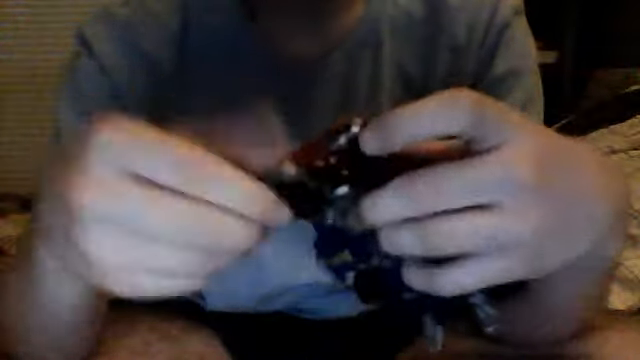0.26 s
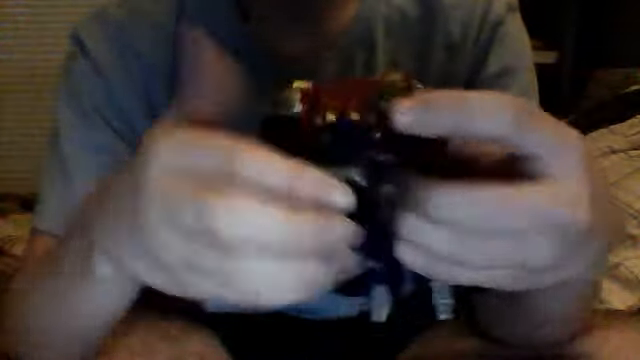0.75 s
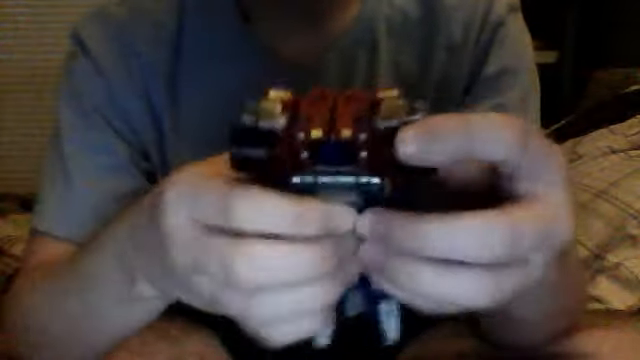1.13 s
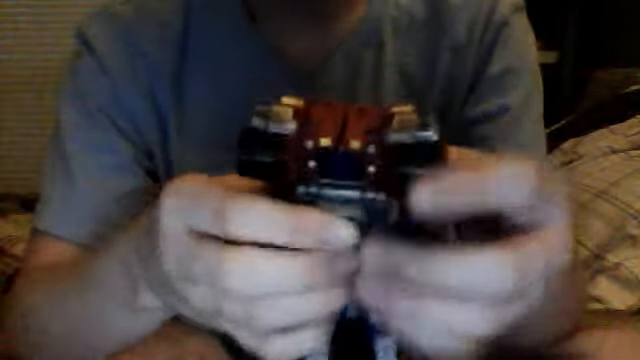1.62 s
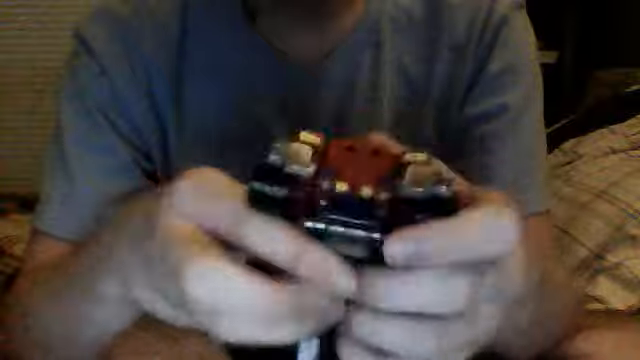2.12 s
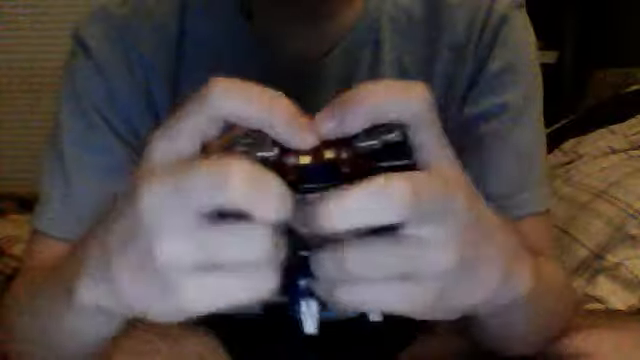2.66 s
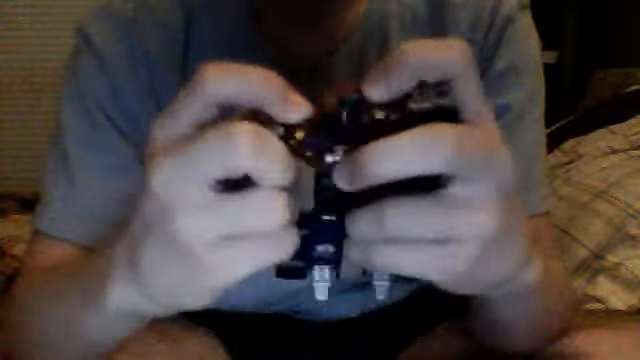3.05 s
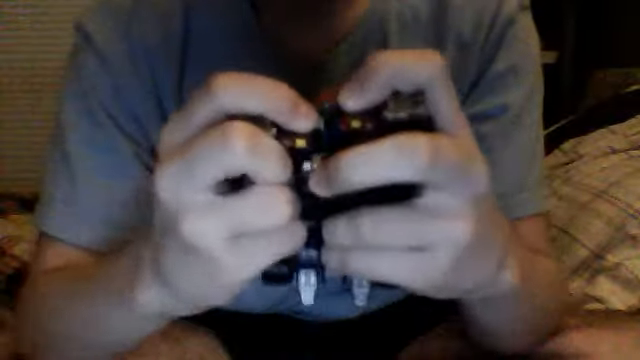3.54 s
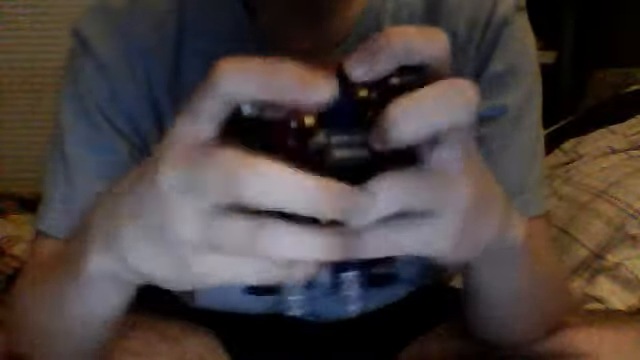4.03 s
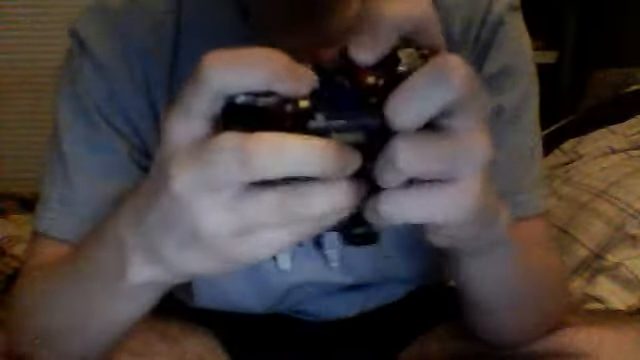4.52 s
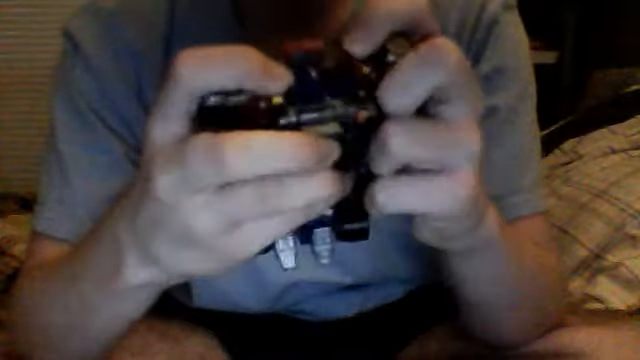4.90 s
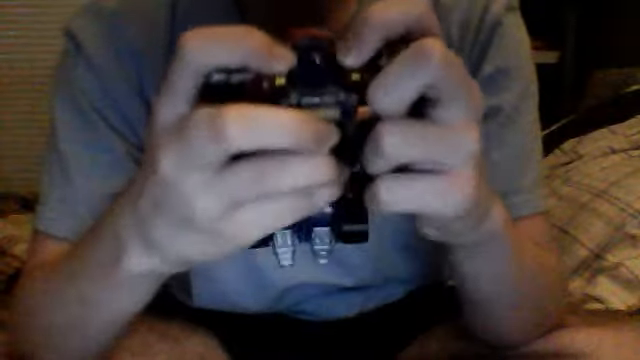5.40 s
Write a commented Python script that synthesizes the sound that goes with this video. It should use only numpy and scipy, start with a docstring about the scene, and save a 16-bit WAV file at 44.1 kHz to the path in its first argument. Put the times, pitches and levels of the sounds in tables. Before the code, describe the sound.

Hard plastic parts click and snap into place in bursts, loose pieces rattling briefly, in a small quiet bedroom with a faint fan.

```python
"""A plastic transforming toy is folded by hand close to a small microphone, with a fan humming faintly throughout.
Near 1 s the first snap rattles and pings; faint clicks and a stiff joint turning follow until 2.7 s.
A cluster of light knocks comes around 3 s, a hard snap at 3.4 s, then more turning, clicks and snaps up to
the hardest snap at 5.1 s and its rattle; one faint click ends it. Each contact is a crack of noise plus decaying
tones; a small bedroom answers with fading noise, and a noise suppressor cuts that tail short."""
import sys
import numpy as np
from scipy import signal
from scipy.fft import rfft, irfft
from scipy.io import wavfile
from scipy.ndimage import uniform_filter1d, map_coordinates

SR = 44100
rng = np.random.default_rng(int(sys.argv[2]) if len(sys.argv) > 2 else 0)


def bounce(signal):
    """Save signal as a 16-bit WAV file at the path given by the first command-line argument."""
    frames = np.transpose(np.atleast_2d(signal))
    limited = np.clip(frames, -1, 1)
    pcm = np.round(limited * 32767).astype(np.int16)
    wavfile.write(sys.argv[1], SR, pcm)


N = 250047  # length in samples


def amp(db):
    """Turn decibels into a gain."""
    return 10 ** (np.asarray(db) / 20)


def unit(x):
    """Scale x to an rms of 1."""
    return x / np.sqrt(np.mean(x ** 2) + 1e-20)


def along(points, hz):
    """Read a curve of (pitch_hz, value) points, with straight lines on a log pitch axis."""
    point_hz, value = np.transpose(points)
    return np.interp(np.log(hz + 1), np.log(point_hz + 1), value)


def wobble(rate):
    """A smooth random curve through `rate` random points a second."""
    points = rng.standard_normal(int(N * rate / SR) + 4)
    return map_coordinates(points, [np.arange(N) * rate / SR])


def noise(spectrum, size):
    """Noise coloured by a table of levels over pitch, at an rms of 1."""
    hz = np.fft.rfftfreq(size, 1 / SR)
    white = rfft(rng.standard_normal(size))
    return unit(irfft(white * amp(along(spectrum, hz)), size))


def add(out, start_s, sound):
    """Mix a sound into out at start_s seconds."""
    out[round(start_s * SR):][:len(sound)] += sound


# colour of the fan's air and the microphone's hiss: pitch_hz, relative level_db per Hz
AIR_COLOUR = [(15, 6), (50, 7.5), (140, 5), (250, 1), (400, -5), (600, -1), (1150, -6), (1600, -11.5),
              (2150, -7), (2750, -18.5), (3400, -21), (4500, -30), (7000, -31.5), (8800, -46.5),
              (16000, -50.5)]
# mains hum and fan tones, before they waver: pitch_hz, level_db (rms)
FAN_TONES = [(48.4, -67), (339.1, -75.5), (633, -68.5), (1265.5, -73), (2620, -88.5), (2998, -87)]


def fan(air_db=-56.0, drift=0.0024, flutter_db=2):
    """Steady rushing noise under tones that waver together in pitch and separately in level."""
    turns = np.cumsum(1 + drift * wobble(4.1)) / SR  # cycles of a tone of 1 Hz
    out = amp(air_db) * noise(AIR_COLOUR, size=N)
    for hz, db in FAN_TONES:
        tone = unit(np.sin(2 * np.pi * hz * turns))
        out += amp(db + flutter_db * wobble(7.1)) * tone
    return out


# how long the bedroom rings: pitch_hz, decay_s (time to fall 60 dB)
ROOM_DECAY = [(150, 0.067), (1000, 0.2), (3000, 0.23), (6500, 0.19), (10000, 0.04)]
# what bedding and walls send back: pitch_hz, relative level_db
WALL_COLOUR = [(150, -3.5), (900, -2.5), (1600, -7), (3000, -4), (4400, 0), (6200, -2.5), (10000, 4.5)]


def room(x, build_up_s=0.002):
    """Walls scatter sound into a fading noise tail, drawn anew for each twelfth of the scene."""
    out = np.zeros(N + SR)
    for piece in np.array_split(np.arange(N), 12):
        hz, t, grains = signal.stft(rng.standard_normal(SR // 3), SR, nperseg=256)
        decay_db = 60 * t / along(ROOM_DECAY, hz)[:, None]
        colour_db = along(WALL_COLOUR, hz)[:, None]
        tail = signal.istft(grains * amp(colour_db - decay_db), SR, nperseg=256)[1]
        tail *= 1 - np.exp(-(np.arange(len(tail)) / SR / build_up_s) ** 2)
        wet = signal.fftconvolve(x[piece], tail / np.linalg.norm(tail))
        add(out, piece[0] / SR, wet)
    return out[:N]


def suppressor(x, threshold_db=-38, steepness=0.52, memory_s=0.0095):
    """Noise suppression passes strong reverberation and turns it down once its short-term power is low."""
    power = np.abs(uniform_filter1d(x ** 2, size=int(memory_s * SR)))
    return x * np.minimum(1, power / amp(threshold_db) ** 2) ** steepness


# stiff joints being turned: peak time start_s, level_db added to the grip
JOINT_TURNS = [(1.959, -70), (3.8, -79), (4.02, -77), (4.17, -76), (4.212, -64)]


def effort(grip_db=-84, rise_s=0.015, fall_s=0.025):
    """Gain of the rubbing: a light steady grip plus an exponential swell and fade for each turn."""
    t = np.arange(N) / SR
    gain = amp(grip_db)
    for s, db in JOINT_TURNS:
        distance = np.maximum((s - t) / rise_s, (t - s) / fall_s)
        gain = gain + amp(db) * np.exp(-distance)
    return gain


def rubbing(slips_per_s=130, spread_db=4, low_hz=2600):
    """Stiff joints turn in tiny random slips that ring only the small parts, so the bass is filtered off."""
    slips = (rng.random(N) < slips_per_s / SR) * amp(spread_db * rng.standard_normal(N))
    highpass = signal.butter(2, low_hz, "high", fs=SR, output="sos")
    ring = signal.sosfilt(highpass, contact(low_hz, crack_db=5.5))
    return effort() * unit(signal.fftconvolve(slips, ring)[:N])


# colour of the whole toy jolting in the hands: pitch_hz, relative level_db per Hz
THUD_COLOUR = [(25, -6.5), (90, 1.5), (200, -6), (450, -1.5), (700, -3), (1500, -40), (16000, -100)]


def thuds(base_db=-4.5, growth=2.1, decay_s=.06, attack_s=0.0013):
    """Each knock jolts the toy with dull fading noise, which gains `growth` dB for each dB of the knock."""
    out, t = np.zeros(N + SR), np.arange(SR // 8) / SR
    envelope = amp(-60 * t / decay_s) * (1 - np.exp(-t / attack_s))
    for s, db, *_ in KNOCKS:
        jolt = noise(THUD_COLOUR, size=len(t)) * envelope
        add(out, s, amp(base_db + growth * db) * jolt)
    return out[:N]


# springy tabs slipping free: start_s, level_db (before the fade), pitch_hz
TAB_PINGS = [(1.0188, -16, 6700), (2.9108, -28, 6020), (3.1622, -20, 3200), (3.4328, -16.5, 6560),
             (4.2215, -27, 6050), (4.2338, -39, 6000), (4.2745, -28, 4230), (4.5895, -11, 6070),
             (5.1168, -25, 6150)]


def pings(decay_s=.02, attack_s=.001):
    """A tab that no finger touches rings on as one short, clear, fading tone."""
    out, t = np.zeros(N + SR), np.arange(SR // 16) / SR
    fade = amp(-60 * t / decay_s) * (1 - np.exp(-(t / attack_s) ** 2))
    for s, db, hz in TAB_PINGS:
        add(out, s, amp(db) * fade * np.sin(2 * np.pi * hz * t))
    return out[:N]


# tones of panels and tabs, before random shifts: pitch_hz, relative level_db, decay_s (to fall 60 dB)
PLASTIC_TONES = [(3232, 5.5, 0.016), (4265, -4, .016), (5990, 0, 0.012), (6677, -10, 0.017)]
# the dry crack of two edges meeting: pitch_hz, relative level_db per Hz
CRACK_COLOUR = [(30, -25), (150, -20), (400, -17.5), (950, -9), (1350, 1), (2800, 7.5), (5000, 0),
                (6900, -2), (7500, -13), (9000, -32), (11000, -40.5), (16000, -56.5)]


def contact(body_hz, crack_db, body_db=2, body_t60=0.015, attack_s=0.0015, scatter_db=1.0):
    """Plastic touches plastic: a crack of noise and the short ring of the hollow body and other parts."""
    t = np.arange(2048) / SR
    parts = [(body_hz, body_db, body_t60)] + PLASTIC_TONES
    hz, db, t60 = np.transpose(parts)[:, :, None]
    shift, strength, phase = rng.standard_normal((3, len(hz), 1))
    hz = hz * (1 + .015 * shift)  # the grip detunes the parts
    fade = amp(db + scatter_db * strength - 60 * t / t60)
    ring = (fade * np.sin(2 * np.pi * (hz * t + phase))).sum(0)
    crack_t60 = .021  # seconds; the fingers damp it at once
    crack = noise(CRACK_COLOUR, size=len(t)) * amp(-60 * t / crack_t60)
    onset = 1 - np.exp(-(t / attack_s) ** 2)
    return (unit(ring) + amp(crack_db) * unit(crack)) * onset


# borders between thump, hollow body, large panel, small panel and tabs: pitch_hz
REGISTER_BORDERS = [150, 900, 2500, 3800, 5200, 8000]


def voiced(click, register_db):
    """Big parts sound low and small tabs high: set the click's level in each register."""
    size = 2 * len(click)
    hz = np.fft.rfftfreq(size, 1 / SR)
    spectrum = rfft(click, size)
    edges = np.searchsorted(hz, REGISTER_BORDERS)
    energy = np.add.reduceat(np.abs(spectrum) ** 2, edges)[:-1] / len(click)
    gain_db = register_db - 10 * np.log10(energy / (.005 * SR))  # levels hold for a 5 ms click
    register = np.searchsorted(edges[1:-1], np.arange(len(hz)))
    gain_db = uniform_filter1d(gain_db[register], size=60)  # soften the borders
    cepstrum = irfft(np.log(amp(gain_db)))[:len(click)]
    cepstrum[1:] *= 2  # causal colour: nothing sounds before the touch
    return irfft(spectrum * np.exp(rfft(cepstrum, size)))[:len(click)]


# an even contact, one row a register from thump to tabs:
# pitch in octaves from the large panel, level_db, share (0 to 1) of the panels' lift
EVEN_CONTACT = [(-1.5, -18.5, 0.094), (-0.85, 1.5, 0), (-0.32, -1, 0.99), (0.32, -2, 0.8), (0.98, 1, 0)]


def strike(strength_db, brightness, panels_db, body_hz, crack_db):
    """A harder edge tilts the contact towards the treble; a blow on a panel lifts the middle."""
    octaves, even_db, panel_share = np.transpose(EVEN_CONTACT)
    register_db = strength_db + even_db + brightness * octaves + panels_db * panel_share
    return voiced(contact(body_hz, crack_db), register_db)


def rattle(first_db, count=3, unevenness=0.066, gap_s=.0048, slowing=1.3, loss_db=8.5):
    """Loose parts bounce after a knock, ever weaker, at widening gaps: (delay s, dB), the knock first."""
    k = np.arange(count)
    gaps_s = gap_s * slowing ** k * np.exp(unevenness * rng.standard_normal(count))
    return [(0, 0), *zip(np.cumsum(gaps_s), first_db - loss_db * k)]


# snaps and the strongest rattling knocks after them: start_s, strength_db, brightness (dB per octave),
# lift of the panels in dB, pitch_hz of the hollow body (before detuning), first bounce in dB against the knock
KNOCKS = [(1.0179, -19.5, -1, 1.5, 2044, -18.5), (2.8972, -35, -4, 1.5, 1430, -5.5),
          (2.9079, -40.5, 0.5, 9.5, 1310, -7.5), (2.9559, -50, -3.5, 12.5, 2220, 1),
          (2.9642, -41.5, -6.5, 9.5, 1970, -6.5), (3.1613, -40, -5.5, 10.5, 1430, -7.5),
          (3.432, -22.5, -5, 3.5, 1420, -16.5), (4.2696, -39.5, -4.5, 0.5, 1434, -11),
          (4.5671, -27.5, -4, 1, 1980, -9.5), (4.5887, -29.5, 1.5, 7.5, 1420, -35.5),
          (5.075, -14, -3.5, 3.5, 1537, -8), (5.0885, -31.5, -4.5, 6.5, 1900, -1),
          (5.1157, -33.5, -3, 6, 2010, -8.5)]
# single, mostly faint clicks, two of them perhaps echoes about 80 ms after a hard snap:
# start_s, strength_db, brightness (dB per octave)
CLICKS = [(0.96, -69.5, 7.5), (1.03, -39.5, -0.5), (1.0976, -61.5, 7), (1.8469, -76, -3), (2.0082, -77, -4),
          (2.102, -68.5, -0.5), (2.3044, -75.5, -2), (2.4976, -75, -2.5), (2.5195, -74, -1),
          (2.669, -71.5, 0), (2.931, -54.5, -1.5), (2.9789, -52.5, -6.5), (3.1802, -52, 4),
          (3.513, -56, -11), (3.735, -72, -9), (3.8047, -76, -1), (4.148, -80, -1), (4.221, -51.5, 4),
          (4.2334, -52.5, 5.5), (4.4404, -77, -6), (4.53, -73, -6.5), (4.843, -76, 1), (5.0658, -38, -2),
          (5.4542, -70, 1)]


def touches(click_panels_db=10.5, click_body_hz=1890):
    """List all knocks, their bounces and the clicks: (s, strength dB, brightness, panels dB, body Hz)."""
    contacts = []
    for s, db, brightness, panels_db, body_hz, rattle_db in KNOCKS:
        for delay_s, bounce_db in rattle(rattle_db):
            contacts.append((s + delay_s, db + bounce_db, brightness, panels_db, body_hz))
    for click in CLICKS:
        contacts.append((*click, click_panels_db, click_body_hz))
    return contacts


def clatter(contacts, crack_db):
    """Every click, knock and bounce is struck in turn, as heard in one direction from the toy."""
    out = np.zeros(N + SR)
    for s, *blow in contacts:
        add(out, s, strike(*blow, crack_db))
    return out[:N]


def scene(room_db=-11, near_crack_db=-3, scattered_crack_db=4):
    """The microphone hears the nearest panels ring; the room gets a noisier clatter from all sides."""
    contacts = touches()
    near = clatter(contacts, near_crack_db)
    answer = amp(room_db) * room(clatter(contacts, scattered_crack_db))
    background = fan() + suppressor(answer)
    toy = rubbing() + thuds() + pings() + near
    return (background + toy)[None]


# the small microphone loses bass and treble: pitch_hz, level_db
MICROPHONE_COLOUR = [(150, -5), (350, -0.5), (7000, 0), (9500, 0), (11500, -11), (16000, -9)]


def record(dry):
    """The microphone rounds off loud peaks, is thin below and dull on top, and passes nothing from 16300 Hz up."""
    ceiling, hardness = .72, 6  # highest level; how suddenly it is reached
    clipped = dry / (1 + np.abs(dry / ceiling) ** hardness) ** (1 / hardness)
    hz = np.fft.rfftfreq(N, 1 / SR)
    response = amp(along(MICROPHONE_COLOUR, hz)) * (hz < 16300)
    return irfft(rfft(clipped) * response, N)


dry = scene()
out = record(dry)
bounce(out)
```